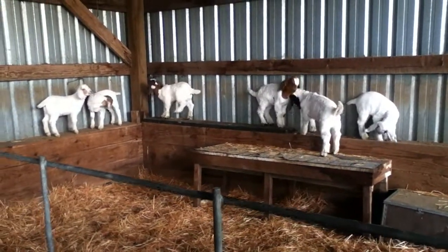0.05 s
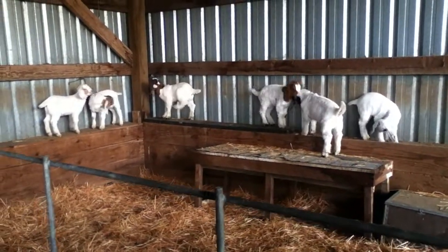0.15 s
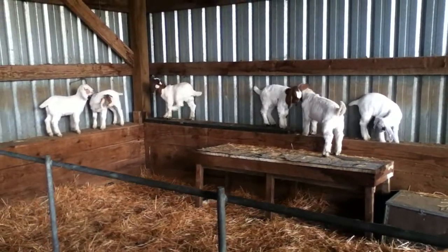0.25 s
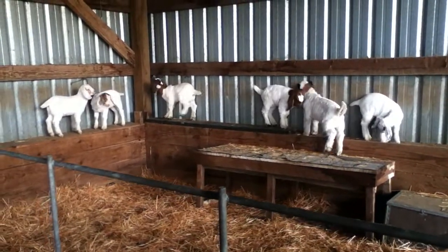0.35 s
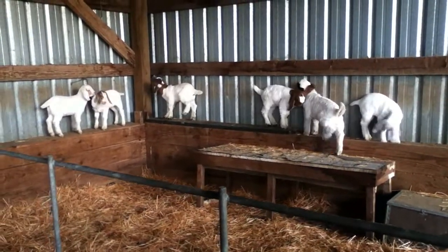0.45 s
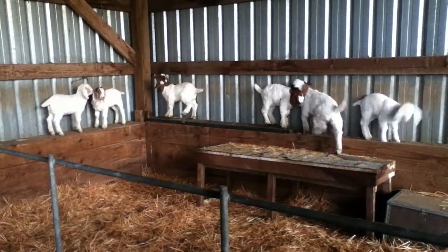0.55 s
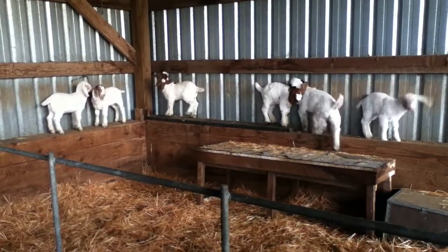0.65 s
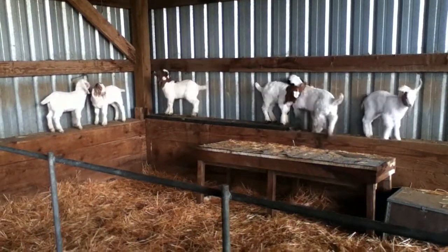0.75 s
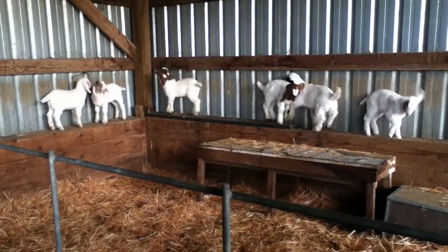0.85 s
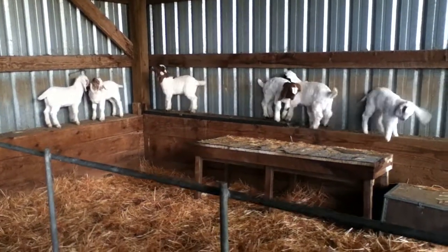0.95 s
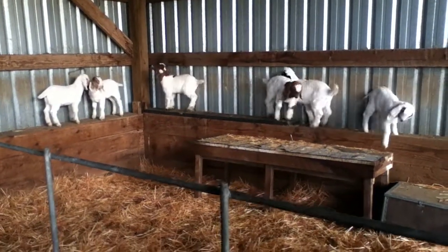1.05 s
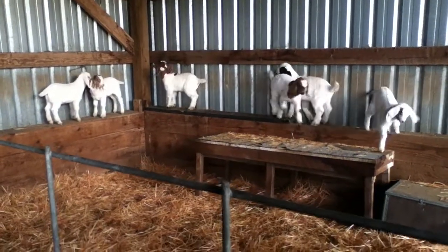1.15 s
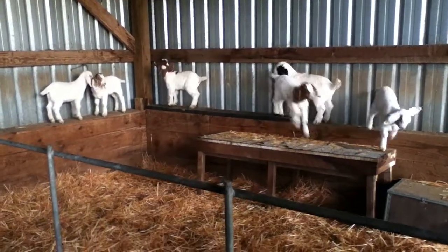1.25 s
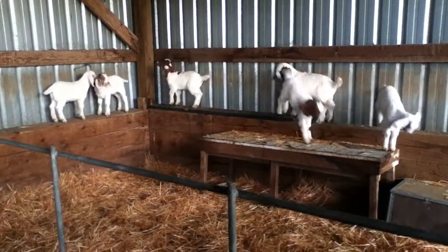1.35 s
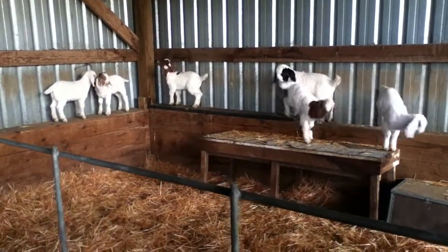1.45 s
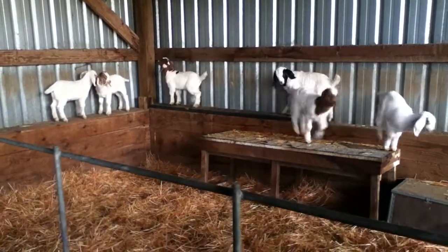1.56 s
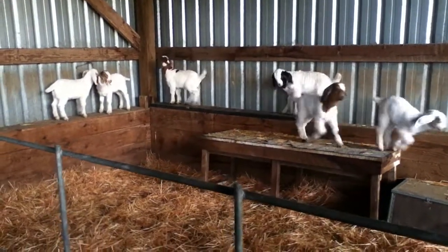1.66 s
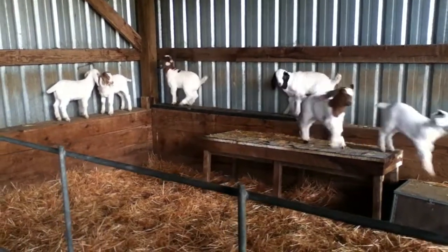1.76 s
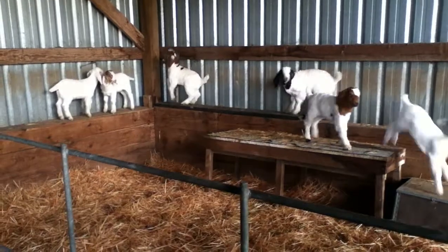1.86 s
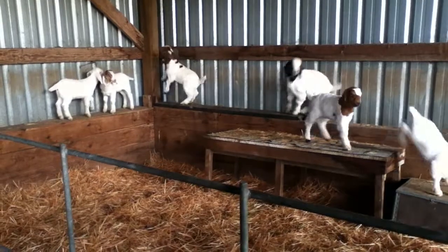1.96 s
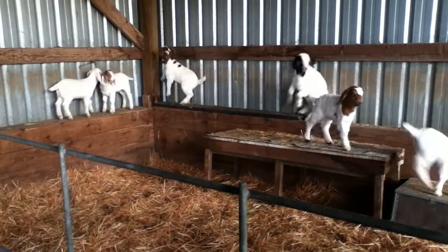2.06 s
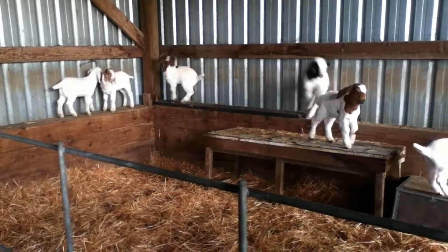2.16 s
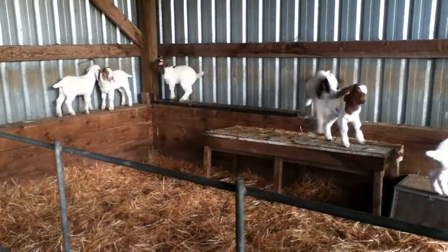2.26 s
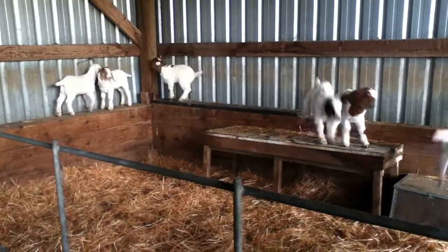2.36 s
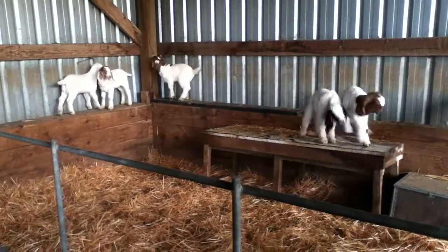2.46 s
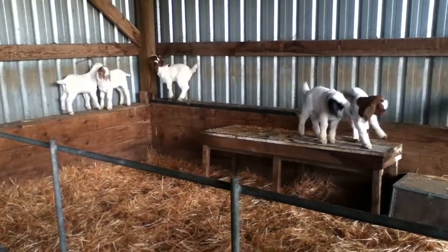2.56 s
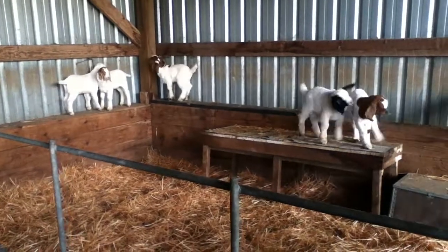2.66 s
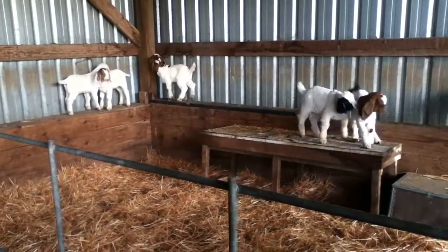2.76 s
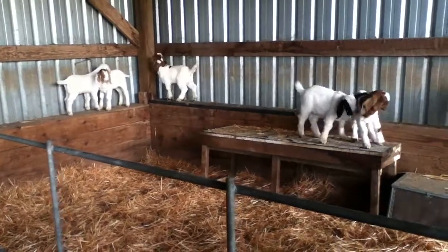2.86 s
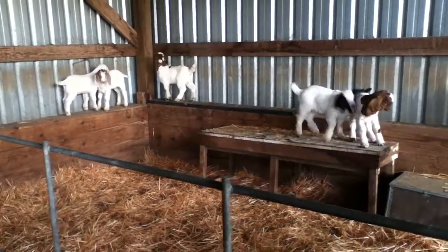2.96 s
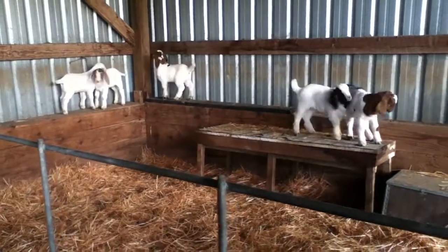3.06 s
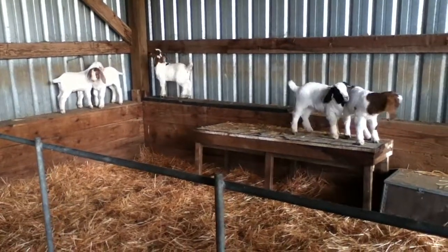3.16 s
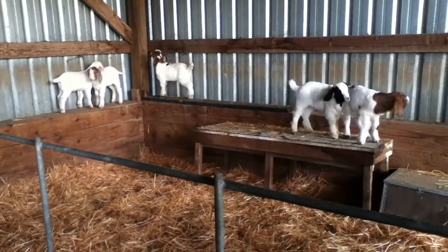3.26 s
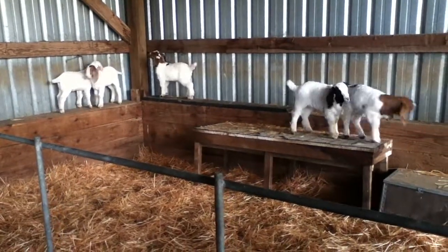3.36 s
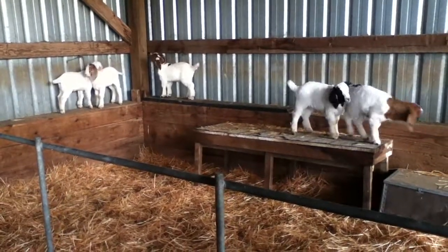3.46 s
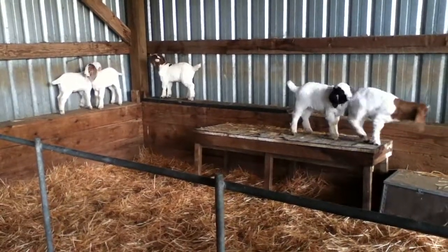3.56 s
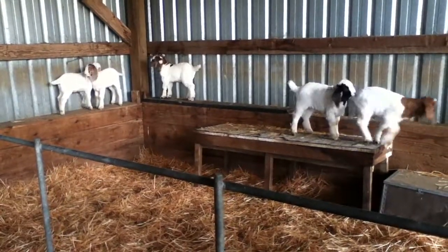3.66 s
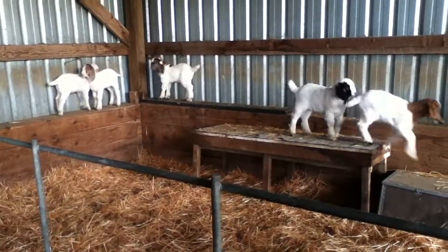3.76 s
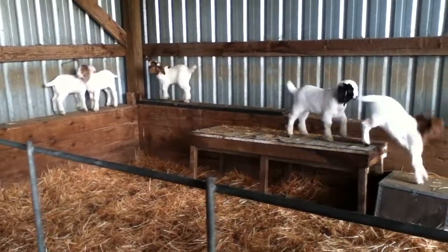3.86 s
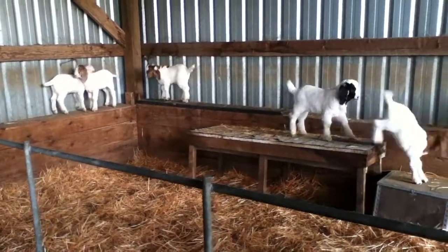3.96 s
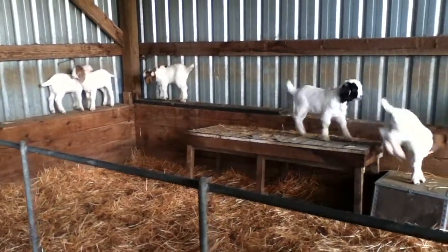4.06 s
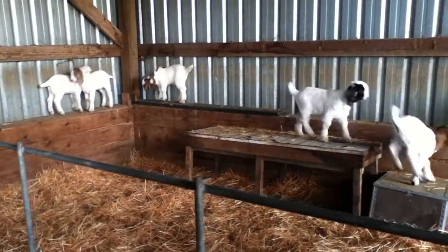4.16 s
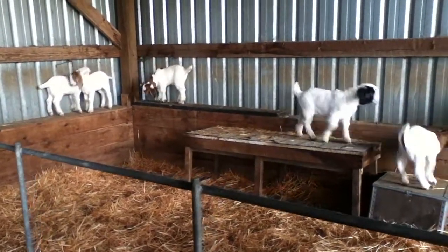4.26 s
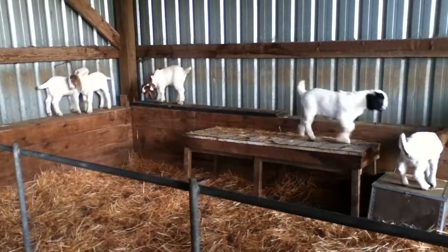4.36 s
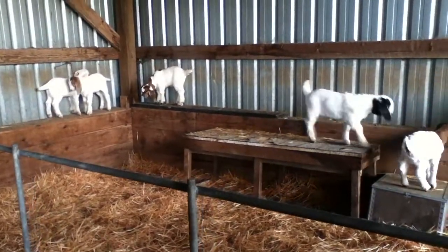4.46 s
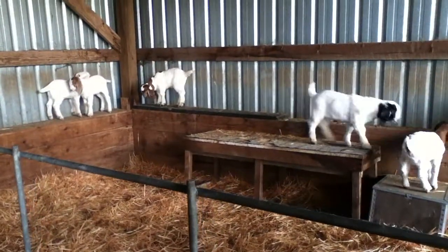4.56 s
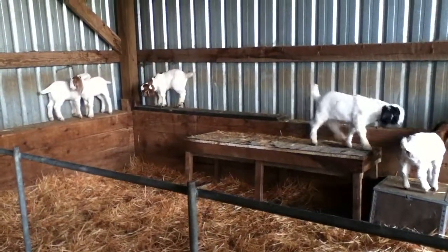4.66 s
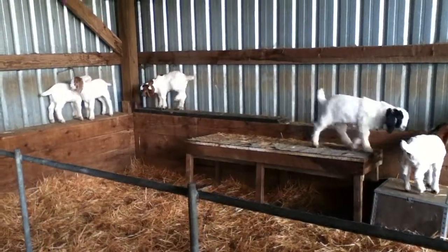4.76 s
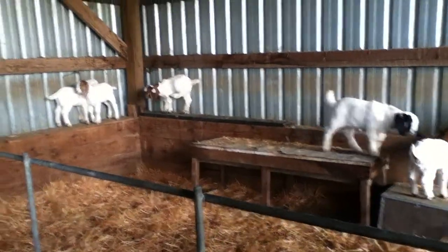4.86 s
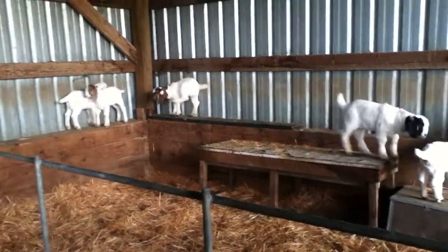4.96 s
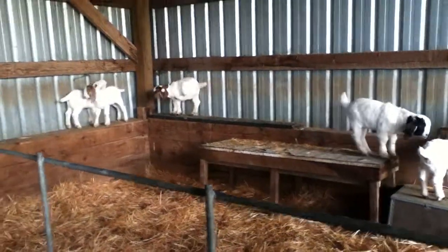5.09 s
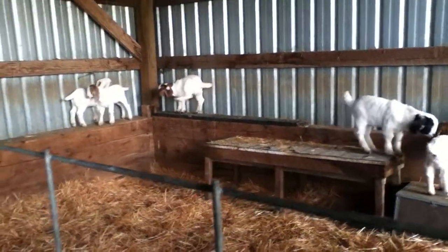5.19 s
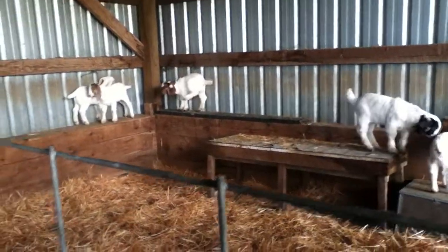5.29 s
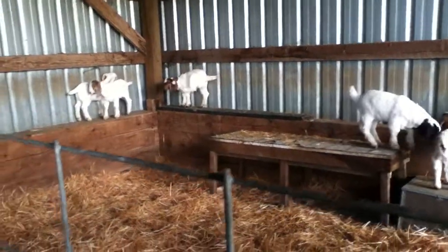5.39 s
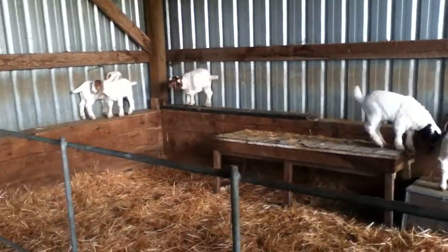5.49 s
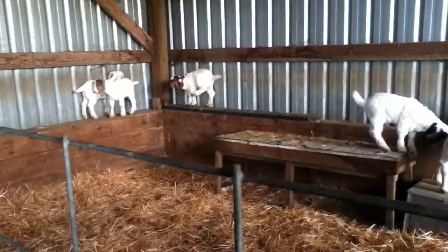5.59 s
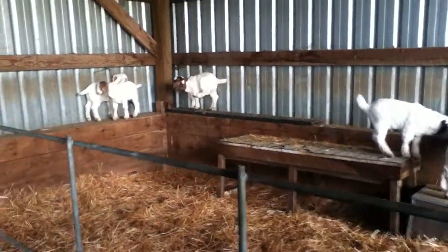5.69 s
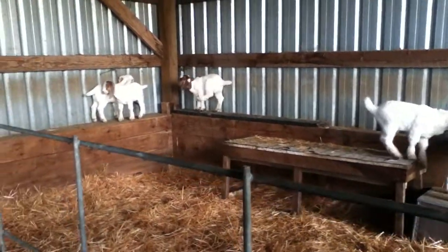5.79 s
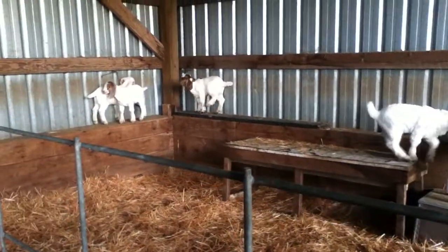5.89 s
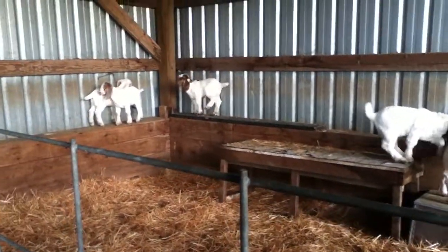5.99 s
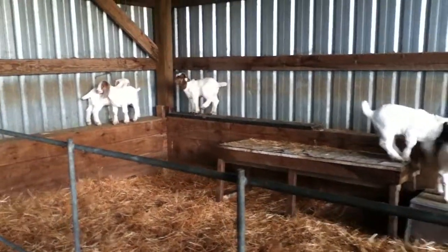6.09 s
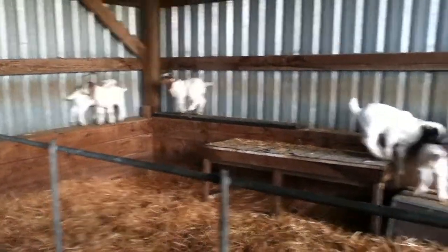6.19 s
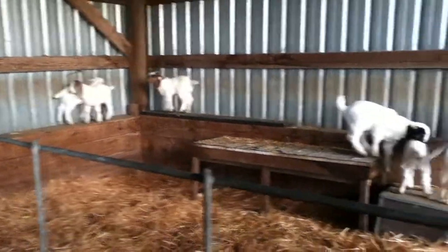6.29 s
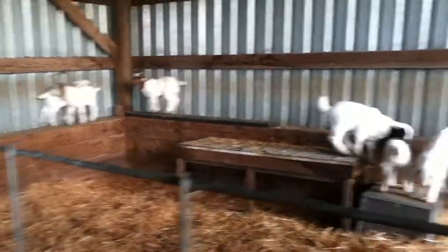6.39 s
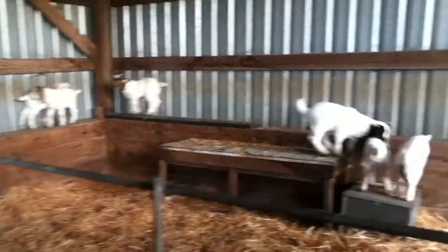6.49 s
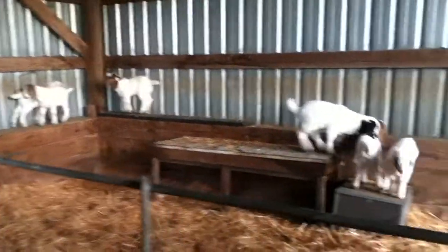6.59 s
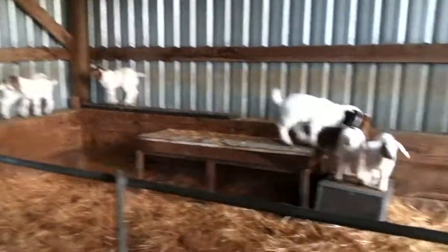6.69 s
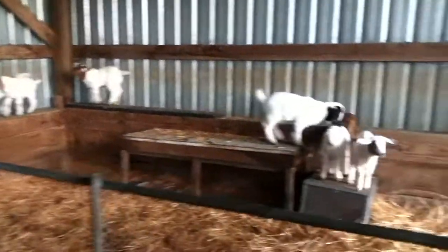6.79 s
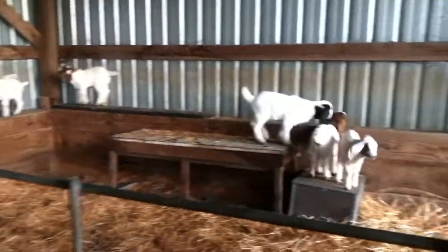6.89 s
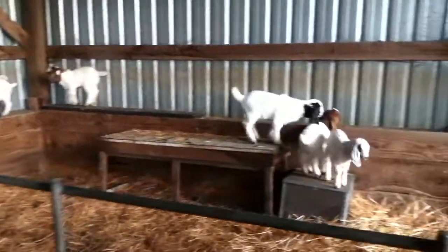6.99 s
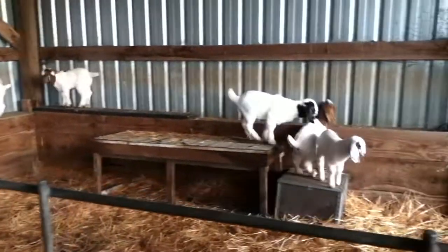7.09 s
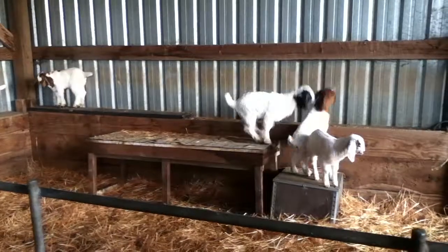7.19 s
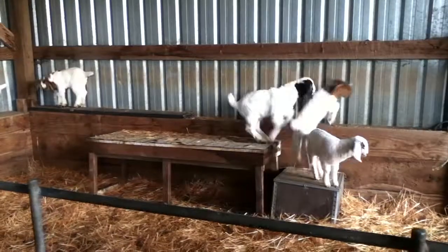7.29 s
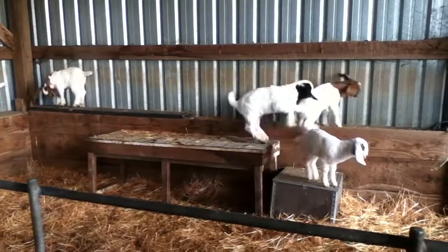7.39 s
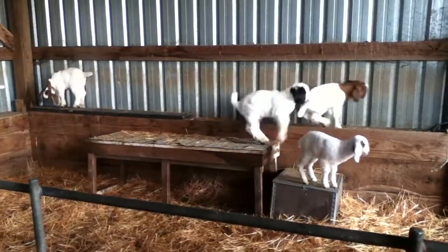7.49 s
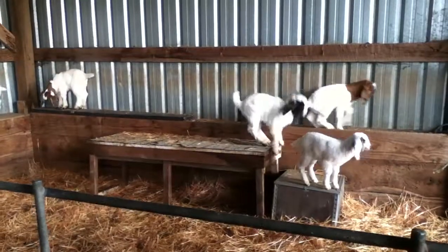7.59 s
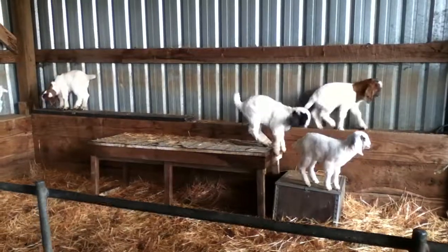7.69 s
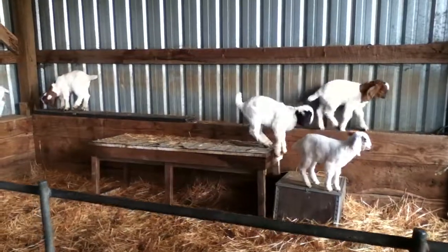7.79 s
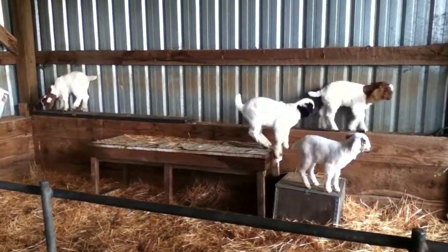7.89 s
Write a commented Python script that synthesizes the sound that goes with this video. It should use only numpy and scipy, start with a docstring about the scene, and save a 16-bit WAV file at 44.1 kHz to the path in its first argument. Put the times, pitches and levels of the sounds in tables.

```python
"""Goats hopping in a tin-walled barn

Young goats hop between a wooden ledge, a bench and a hollow box, heard through one small microphone.
Each hoof is a filtered noise click, plank modes with dense grain, hollow modes and a low frame thump.
Scuffs and tiny ticks are shaped noise bursts, squeaks are wavering tones; faint steps fall at random.
The barn adds a short tail of sparse reflections, over shaped noise for the outdoor wash and hiss."""
import sys
import numpy as np
from scipy import signal
from scipy.fft import rfft, irfft
from scipy.io import wavfile
from scipy.ndimage import uniform_filter1d

SR = 44100
rng = np.random.default_rng(int(sys.argv[2]) if len(sys.argv) > 2 else 0)


def master_out(mix):
    """Clip the mix to full scale and print it as 16-bit PCM to the path in sys.argv[1]."""
    frames = np.transpose(np.atleast_2d(mix))
    ceiling = np.clip(frames, -1, 1)
    pcm = np.round(ceiling * 32767).astype(np.int16)
    wavfile.write(sys.argv[1], SR, pcm)


N = 350154  # length in samples

# Hoof falls on the wood. Each row: start in seconds, horn click, plank knock and hollow boom in dB,
# knock centre in Hz, place.
HOOF_FALLS = [(0.1562, -43, -36.5, -37, 750, "ledge"), (0.179, -49, -62, -40.5, 729, "ledge"),
              (0.721, -42, -31, -20, 680, "ledge"), (0.911, -53, -37, -42.5, 800, "ledge"),
              (1.009, -54, -41, -37.5, 700, "ledge"), (1.1198, -53, -59, -30, 646, "bench"),
              (1.147, -59, -58, -37, 646, "bench"), (1.206, -44, -31.5, -54, 1300, "box"),
              (1.2499, -44, -28.5, -36.5, 1150, "bench"), (1.3615, -45, -38, -35.5, 1160, "ledge"),
              (1.4056, -22, -35, -26, 540, "end"), (1.4529, -25.5, -25.5, -24.5, 1460, "bench"),
              (1.705, -30.5, -36, -31, 572, "bench"), (1.7402, -35, -36.5, -33.5, 744, "bench"),
              (1.7827, -30.5, -31.5, -30, 830, "box"), (1.892, -41, -46, -30.5, 966, "ledge"),
              (1.9916, -14.5, -13.5, -18.5, 610, "end"), (2.0207, -21, -23, -9, 795, "bench"),
              (2.035, -47, -18.5, -10.5, 705, "end"), (2.0492, -57, -22.5, -19.5, 690, "bench"),
              (2.069, -32, -25, -19, 665, "end"), (2.142, -40, -36, -29.5, 522, "ledge"),
              (2.2142, -55, -41, -28.5, 743, "bench"), (2.259, -40, -30.5, -27, 850, "end"),
              (2.2917, -32, -19, -15, 800, "end"), (2.461, -22, -29, -25.5, 530, "bench"),
              (2.474, -14.5, -22, -18, 610, "bench"), (2.487, -29, -19, -30, 1010, "end"),
              (2.5048, -12.5, -10, -15.5, 610, "end"), (2.5183, -20, -16.5, -14, 900, "end"),
              (2.5703, -20, -22, -25, 700, "end"), (2.589, -42, -28.5, -30, 810, "end"),
              (2.6368, -31, -37, -56, 1140, "bench"), (2.682, -23.5, -33, -43, 1190, "bench"),
              (2.697, -50, -39, -28.5, 700, "box"), (2.7227, -47, -33, -30.5, 940, "bench"),
              (2.8986, -33, -38.5, -38, 594, "ledge"), (2.928, -31, -29.5, -23.5, 890, "ledge"),
              (2.9952, -39, -56, -24.5, 942, "bench"), (3.0048, -36, -39, -37, 920, "ledge"),
              (3.0453, -34.5, -46, -30.5, 806, "ledge"), (3.1372, -34, -34.5, -28, 565, "bench"),
              (3.1581, -28.5, -26.5, -29.5, 695, "ledge"), (3.2047, -53, -32, -31, 754, "ledge"),
              (3.7388, -104, -34.5, -34.5, 755, "ledge"), (4.0132, -27, -26, -12, 760, "box"),
              (4.039, -29, -42, -9.5, 525, "bench"), (4.0621, -54, -34, -12.5, 522, "box"),
              (4.345, -34, -35, -22, 696, "ledge"), (4.3959, -37, -25, -17, 845, "box"),
              (4.4137, -23.5, -18, -15, 1130, "box"), (4.8325, -41.5, -36, -60, 820, "bench"),
              (4.9245, -46, -37.5, -30, 750, "bench"), (5.021, -29.5, -24.5, -23.5, 920, "end"),
              (5.0746, -45, -24.5, -29.5, 970, "end"), (5.1452, -37, -29.5, -46, 1090, "rim"),
              (5.197, -42, -33, -24.5, 1340, "bench"), (5.206, -43, -31, -19.5, 695, "bench"),
              (5.2838, -44, -31.5, -22, 820, "bench"), (5.351, -38, -39, -26.5, 614, "box"),
              (5.428, -61, -31.5, -36, 890, "end"), (5.483, -44, -40, -28.5, 950, "bench"),
              (5.5999, -42, -38, -34.5, 536, "bench"), (5.6547, -43, -29.5, -29, 810, "box"),
              (5.6816, -36, -26.5, -19, 520, "bench"), (5.7379, -38, -25, -29.5, 870, "bench"),
              (6.32, -29.5, -25.5, -24.5, 1120, "bench"), (6.3335, -51, -48, -22.5, 1130, "bench"),
              (6.3711, -33, -39, -22, 525, "bench"), (6.4491, -12, -12, -15, 900, "box"),
              (6.463, -27, -18, -20.5, 680, "end"), (6.495, -40, -34, -23.5, 600, "end"),
              (6.7026, -33, -31.5, -55, 675, "end"), (6.7266, -28.5, -34, -34.5, 963, "box"),
              (6.81, -41, -33.5, -37, 890, "end"), (6.896, -28, -29.5, -16.5, 736, "bench"),
              (7.0207, -36.5, -38.5, -54, 746, "bench"), (7.1107, -52, -50, -25.5, 525, "box"),
              (7.1659, -37.5, -33, -19.5, 760, "box"), (7.296, -36, -50, -37.5, 528, "ledge"),
              (7.3667, -38, -34, -26, 730, "bench"), (7.4819, -36, -35, -30, 930, "ledge"),
              (7.566, -27, -20.5, -29, 900, "rim"), (7.572, -55, -34, -17, 600, "box"),
              (7.611, -25, -24, -21.5, 800, "bench"), (7.673, -32, -17.5, -23.5, 1730, "end"),
              (7.6828, -31.5, -16, -21, 980, "end"), (7.722, -37, -30, -28, 1300, "end"),
              (7.817, -41, -24.5, -28.5, 880, "rim")]
# Where a hoof can land; "end" is the end of the bench, "rim" the stiff rim of the box.
# Each entry: boom centre in Hz, ring time as a factor before the blow chokes it.
LANDING_PLACES = {"box": (96, 0.67), "ledge": (216, 1.), "bench": (262, 0.74), "end": (560, 0.67),
                  "rim": (230, 0.3)}
# Horn click spectrum. Each row: frequency in Hz, level in dB per Hz (relative).
CLICK_SPECTRUM = [(880, 0), (1500, 0), (2250, -5), (2590, -4.5), (7540, -19), (10100, -26.5), (14800, -46),
                  (16000, -57)]
# Modes of the planks, before random detuning. Each row: frequency in Hz, relative level in dB.
PLANK_MODES = [(535, 1.5), (600, -2.5), (668, -1.5), (755, -1.5), (840, -1), (945, -3.5), (1040, -4.5),
               (1155, -28), (1280, 0.5), (1420, -4), (1590, -9), (1705, -9.5), (1860, -1), (2120, -8),
               (2480, -15.5), (2850, -21.5)]
# Modes of the hollow under the planks, before random detuning. Each row: frequency in Hz, relative level in dB.
HOLLOW_MODES = [(120, -6), (147, 2.5), (178, 1.5), (208, -2.5), (262, -4.5), (303, 3.5), (340, -2.5),
                (368, -3.5), (424, -2.5), (468, -5.5)]
# Scuffs and tiny ticks of hooves, as short noise bursts. Each row: start in seconds, length in seconds,
# level in dB, centre in Hz (before a treble roll-off).
SCUFFS_AND_TICKS = [(0.161, 0.03, -57.5, 5000), (2.251, 0.035, -53, 6950), (2.054, 0.043, -50.5, 7500),
                    (2.465, 0.1, -34.5, 1295), (2.572, 0.031, -36.5, 1500), (1.21, 0.027, -58, 1380),
                    (1.255, 0.044, -51, 1170), (1.403, 0.015, -40, 3180), (1.455, 0.053, -41, 1400),
                    (1.766, 0.035, -49.5, 2770), (4.337, .02, -52.5, 9600), (4.39, 0.023, -51.5, 9500),
                    (4.401, 0.07, -51, 1910), (5.018, 0.035, -54, 3170), (5.068, 0.028, -46.5, 2400),
                    (7.684, 0.062, -42.5, 1900), (2.63, 0.14, -57, 5940), (2.858, 0.045, -55, 3800),
                    (3.137, 0.042, -61, 5050), (3.75, 0.13, -52, 2970), (3.793, 0.068, -52, 9300),
                    (4.611, 0.043, -48, 3800), (4.853, 0.092, -54, 5100), (3.312, 0.0079, -51, 7500),
                    (3.503, 0.015, -55, 6960), (2.785, 0.023, -57, 7900), (5.324, 0.044, -58.5, 5100),
                    (5.672, 0.042, -56, 5000), (6.449, .05, -45, 2970), (6.646, 0.017, -59, 8740),
                    (7.468, 0.097, -57, 7050), (7.753, 0.061, -58.5, 7900)]
# Thin squeaks of horn on wood. Each row: start in seconds, length in seconds, level in dB, mean pitch in Hz.
HORN_SQUEAKS = [(2.576, .02, -40, 7450), (2.581, .022, -38, 6950), (2.605, .018, -46, 6950)]
# Decay of the barn. Each row: frequency in Hz, time to fall 60 dB in seconds.
BARN_DECAY = [(100, 0.5), (1500, 0.28), (4000, 0.21), (12000, 0.2)]
# Spectrum of outdoor wash and hiss. Each row: frequency in Hz, level in dB per Hz (relative).
WASH_SPECTRUM = [(12, -48), (20, -16.5), (130, 1.5), (285, -1), (472, -5.5), (825, -3.5), (2020, -12.5),
                 (5230, -28.5), (9670, -30.5), (14700, -37.5), (16000, -39)]

HORN_BAND_HZ, HORN_FAVOUR_DB = (2400, 5500), 4  # each click favours its own band by up to this much
KNOCK_RISE_S = 0.0035  # the plank takes up the blow more slowly than the horn clicks
GRAIN_SHARE = 0.5  # dense small modes beside the plank modes
GRAIN_FOCUS = 1.93  # the grain narrows as the plank modes do
PLANK_RING = 0.6  # planks ring shorter than the hollow, as a factor
CHOKE_DB_PER_DB = 0.57  # ring time shrinks by this many dB for each dB of blow
FRAME_HZ, FRAME_T60_S = 75, 0.093  # the whole timber frame
WOOD_LOW_HZ = 49  # the hoof sounds carry little below this
LIGHT_STEP_COUNT = 16
LIGHT_DB, LIGHT_SPREAD_DB = (-39, -43.5, -43), 3  # mean click, knock and boom; spread either way
LIGHT_KNOCK_HZ = (537, 1060)  # lowest and highest knock centre
BARN_DB, BARN_LOW_HZ = -6.5, 222  # thin tin walls let the bass escape
WASH_DB = -44.5  # rms level
MIC_LOW_HZ, RECORDER_EDGE_HZ = 36, 15850


def hooves():
    """A hoof strikes wood: horn clicks, plank knocks, hollow booms, and heavy blows shake the frame."""
    t, out = np.arange(SR // 3) / SR, np.zeros(N)
    thump = frame_thump(t)
    low_count = len(HOLLOW_MODES)
    for s, click_db, knock_db, boom_db, knock_hz, place in HOOF_FALLS + light_steps():
        luck = rng.standard_normal((2, len(HOLLOW_MODES + PLANK_MODES)))
        grit = rng.standard_normal(len(t))
        rebounds = rng.random((3, 2))
        horn_hz = np.exp(rng.uniform(*np.log(HORN_BAND_HZ)))
        luck[0] = np.sign(luck[0]) * (1 + 0.48 * abs(luck[0]))
        # one push starts all the low modes the same way
        luck[0, :low_count] = abs(luck[0, :low_count])

        boom_hz, stretch = LANDING_PLACES[place]
        # a heavy blow chokes its ring
        blow_db = max(knock_db, boom_db) + 31.0
        stretch = np.clip(stretch * amp(-CHOKE_DB_PER_DB * blow_db), 0.2, 3.3)
        # a faint click means a soft, slow contact (seconds)
        contact = 0.00032 * amp(-0.55 * (click_db + 27.5))
        # a hard edge wakes every mode, a soft contact only the nearest
        depth_db = np.clip(6.5 + 0.4 * (knock_db - click_db), 4, 24)

        boom = hollow_boom(boom_hz, luck[:, :low_count], t, stretch)
        knock = plank_knock(knock_hz, depth_db, luck[:, low_count:], grit, t, stretch, contact)
        click = horn_click(horn_hz, grit, t, stretch, contact)
        thump_db = 2.0 * boom_db + 1.0  # grows faster than the boom
        fall = amp(boom_db) * peaked(boom)
        fall += amp(knock_db) * chattered(knock, rebounds, 0.011)
        fall += amp(click_db) * chattered(click, rebounds, 0.008)
        fall += amp(thump_db) * thump
        add(out, s, fall)
    return signal.sosfilt(signal.butter(4, WOOD_LOW_HZ, "high", fs=SR, output="sos"), out)


def horn_click(horn_hz, grit, t, stretch, contact):
    """Horn on wood: a brief crack of noise, then dense high modes dying away."""
    def spectrum_db(hz):
        away_db = HORN_FAVOUR_DB * np.log2((hz + 1) / horn_hz) ** 2
        return read(CLICK_SPECTRUM, hz) - np.minimum(away_db, HORN_FAVOUR_DB)

    crack = np.exp(-t / (3 * contact))
    dense_modes = 0.8 * amp(-60 * t / (0.15 * stretch))
    rise = 1 - np.exp(-t / (0.3 * contact))
    noise = grit * (crack + dense_modes) * rise
    return peaked(coloured(noise, spectrum_db) * (t < 0.25))


def plank_knock(knock_hz, depth_db, luck, grit, t, stretch, contact):
    """The struck plank rings in separate modes, with noise standing for its dense small modes."""
    modes = peaked(ring(PLANK_MODES, knock_hz, 40.0, depth_db, luck, t, PLANK_RING * stretch))
    grain = coloured(grit[::-1], lambda hz: -GRAIN_FOCUS * depth_db * np.log2((hz + 1) / knock_hz) ** 2)
    grain = evened(grain) * amp(-60 * t / (0.073 * stretch))
    rise = 1 - np.exp(-t / (contact + KNOCK_RISE_S))
    return (modes + GRAIN_SHARE * grain) * rise


def hollow_boom(boom_hz, luck, t, stretch):
    """The hollow under the planks swells up slowly in its low modes."""
    rise = 1 - np.exp(-t / 0.0095)
    return ring(HOLLOW_MODES, boom_hz, 9.7, 9.1, luck, t, stretch) * rise


def frame_thump(t):
    """The whole timber frame sways as one low, dying mode."""
    rise = 1 - np.exp(-t / 0.013)
    return amp(-60 * t / FRAME_T60_S) * np.sin(2 * np.pi * FRAME_HZ * t) * rise


def ring(modes, centre_hz, focus_db, depth_db, luck, t, stretch):
    """Dying modes; the struck spot favours those near its centre, luck sets signs and detuning."""
    hz, db = np.transpose(modes)[:, :, None]
    near_db = -np.minimum(focus_db * np.log2(hz / centre_hz) ** 2, depth_db)
    share = amp(db + near_db) * luck[0][:, None]
    t60 = 0.16 * stretch * (hz / 300) ** -0.35  # wood damps high modes faster
    decay = amp(-60 * (t / t60) ** 1.49)  # the hoof's growing weight chokes the ring
    tones = np.sin(2 * np.pi * hz * (1 + 0.049 * luck[1][:, None]) * t)
    return (share * decay * tones).sum(0)


def chattered(x, chance, spread_s):
    """The second claw and small rebounds repeat the blow a few milliseconds later."""
    out = x.copy()
    for when, size in chance:
        add(out, spread_s * (0.2013 + when), (0.4 + 0.5 * size) * x)
    return peaked(out)


def light_steps():
    """Goats shifting about: faint steps at random moments and places, as rows like HOOF_FALLS."""
    rows, places = [], list(LANDING_PLACES)
    low_hz, high_hz = LIGHT_KNOCK_HZ
    for _ in range(LIGHT_STEP_COUNT):
        when, pitch, place, *size = rng.random(6)
        levels_db = np.add(LIGHT_DB, LIGHT_SPREAD_DB * (2 * np.array(size) - 1))
        knock_hz = low_hz + pitch * (high_hz - low_hz)
        rows.append((when * N / SR, *levels_db, knock_hz, places[int(place * len(places))]))
    return rows


def scuffs_and_ticks():
    """Scuffs and tiny ticks of hooves: bursts of uneven wide-band noise that swell and fade."""
    out = np.zeros(N)
    for s, length, level_db, centre_hz in SCUFFS_AND_TICKS:
        grit = rng.standard_normal(8192) * amp(1.1 * rng.exponential(1, 8192))
        band = coloured(grit, lambda hz: -7.0 * np.log2((hz + 1) / centre_hz) ** 2 - 11.0 * (hz / 13000) ** 3)
        band = evened(band)[:round(length * SR)]
        add(out, s, amp(level_db) * band * signal.windows.tukey(len(band), 0.6))
    return out


def squeaks():
    """Quick stick and slip of horn on wood, as short tones of wavering pitch."""
    out = np.zeros(N)
    for s, length, level_db, hz in HORN_SQUEAKS:
        waver = evened(uniform_filter1d(rng.standard_normal(round(length * SR)), size=150))
        tone = np.sin(2 * np.pi * np.cumsum(hz * (1 + 0.012 * waver)) / SR)
        add(out, s, amp(level_db) * tone * np.hanning(len(tone)))
    return out


def barn(x):
    """Sparse reflections of random sign, each band dying at its own speed; three tails take turns."""
    out, turn = np.zeros(N), np.arange(N) / SR * 2 * np.pi * 1.7
    for k in range(3):
        taps, at = np.zeros(SR // 2), np.arange(300, SR // 2 - 20, 20)
        taps[at + rng.integers(0, 20, len(at))] = rng.choice([-1., 1.], len(at))
        hz, t, z = signal.stft(taps, SR, nperseg=512)
        decay = amp(-60 * t / read(BARN_DECAY, hz)[:, None])
        tail = signal.istft(z * decay, SR, nperseg=512)[1]
        # the squares of the three windows sum to one
        window = np.sqrt(2 / 3) * np.cos(turn + k * np.pi / 3)
        out += signal.fftconvolve(x * window, tail / np.linalg.norm(tail))[:N]
    return signal.lfilter(*signal.butter(1, BARN_LOW_HZ, "high", fs=SR), out)


def wash():
    """Outdoor wash and microphone hiss as one noise bed, with drifting patches and a slow swell."""
    frames, hz = N // 256 + 5, np.fft.rfftfreq(1024, 1 / SR)
    a, b, patches = rng.standard_normal((frames, 513, 3)).T
    patches = uniform_filter1d(patches, size=10, axis=0)  # smooth over frequency
    patches = evened(uniform_filter1d(patches, size=10, axis=1))  # then over time
    swell = evened(uniform_filter1d(rng.standard_normal(frames), size=30))
    level_db = read(WASH_SPECTRUM, hz)[:, None] + 1.1 * patches + 0.5 * swell
    noise = signal.istft((a + 1j * b) * amp(level_db), nperseg=1024, noverlap=768)[1][:N]
    return amp(WASH_DB) * evened(noise)


def amp(db):
    """Decibels to gain."""
    return 10 ** (np.asarray(db) / 20)


def evened(x):
    """Scales to rms 1."""
    return x / np.sqrt(np.mean(x ** 2) + 1e-20)


def peaked(x):
    """Scales to peak 1."""
    return x / (abs(x).max() + 1e-20)


def read(points, hz):
    """Reads a table on a log-frequency axis."""
    f, value = np.transpose(points)
    return np.interp(np.log(hz + 1), np.log(f + 1), value)


def coloured(x, gain_db):
    """Filters x by a gain curve given as a function of frequency."""
    hz = np.fft.rfftfreq(len(x), 1 / SR)
    return irfft(rfft(x) * amp(gain_db(hz)), len(x))


def add(mix, s, sound):
    """Mixes a sound in at s seconds."""
    part = mix[round(s * SR):][:len(sound)]
    part += sound[:len(part)]


def scene():
    """Goats, the barn around them and the background, on one channel."""
    goats = hooves() + scuffs_and_ticks() + squeaks()
    return (goats + amp(BARN_DB) * barn(goats) + wash())[None]


def record(dry):
    """The small microphone drops the deepest bass; then the band limit of the recorder."""
    thin = signal.sosfilt(signal.butter(2, MIC_LOW_HZ, "high", fs=SR, output="sos"), dry)
    band_limit = signal.firwin(511, RECORDER_EDGE_HZ, window=("kaiser", 9), fs=SR)
    return signal.oaconvolve(thin, band_limit[None], "same")


dry = scene()
out = record(dry)
master_out(out)
```